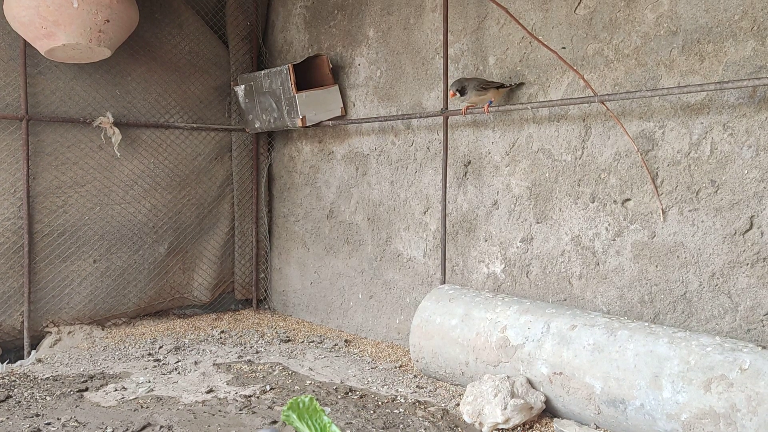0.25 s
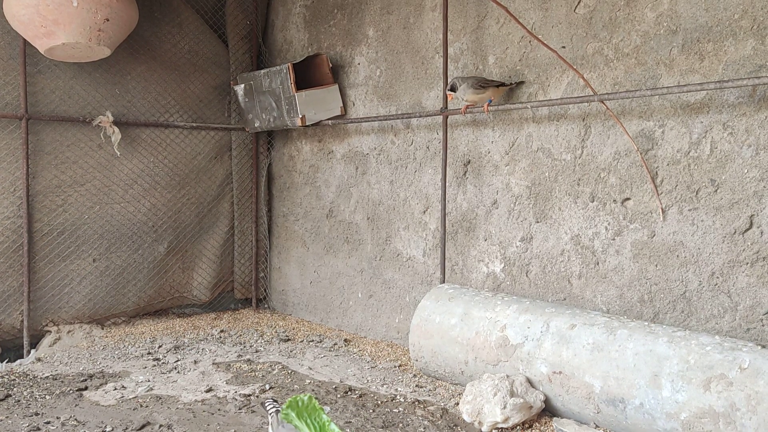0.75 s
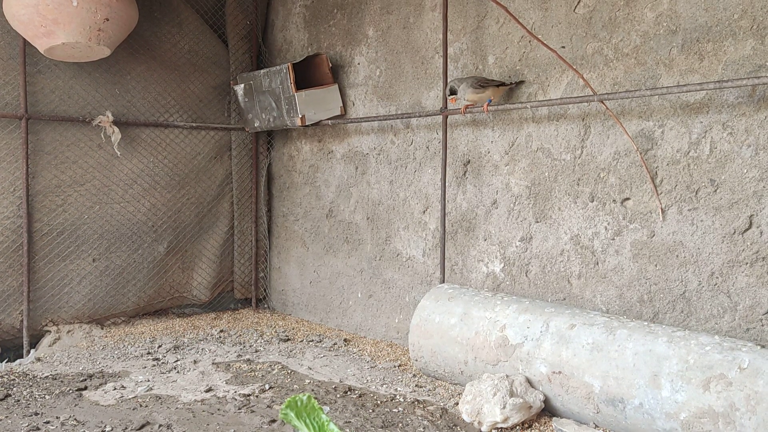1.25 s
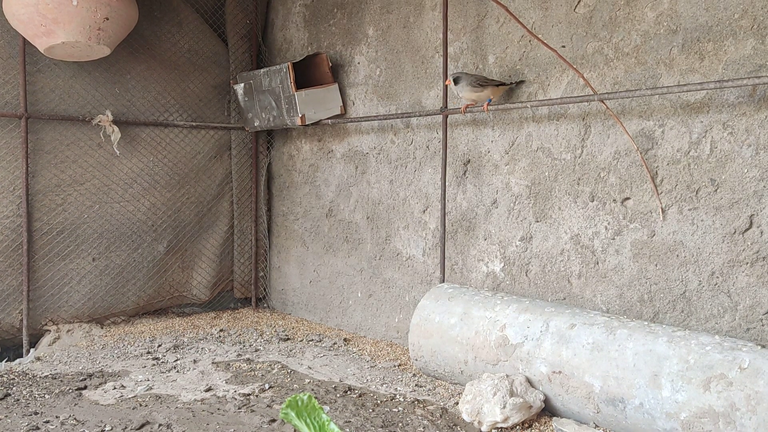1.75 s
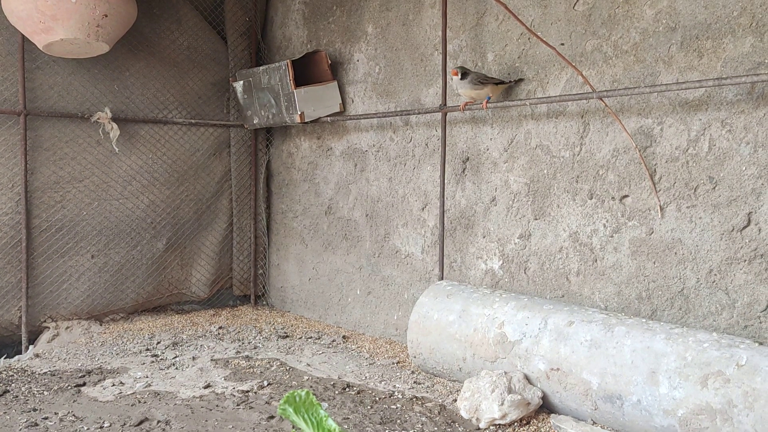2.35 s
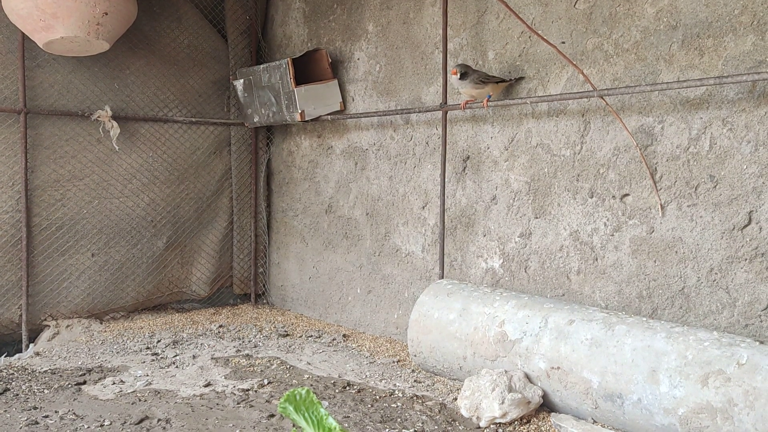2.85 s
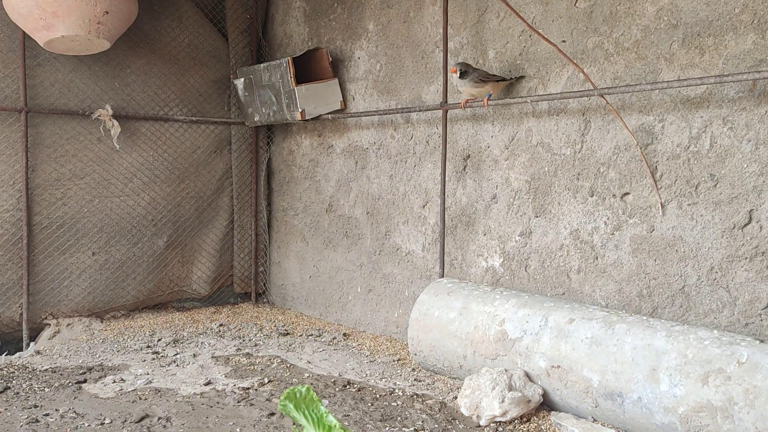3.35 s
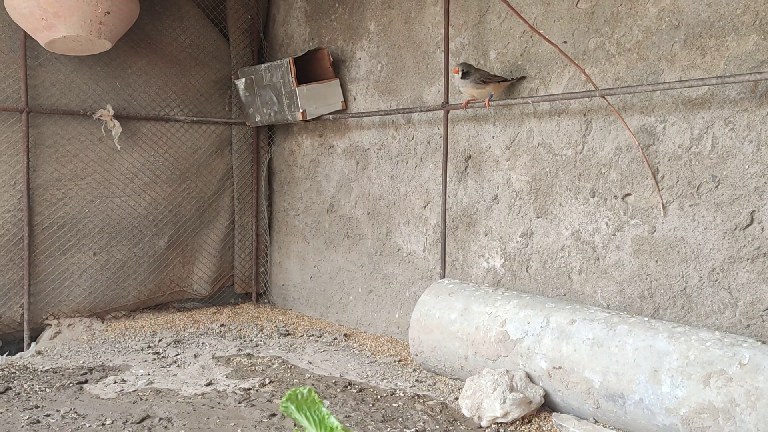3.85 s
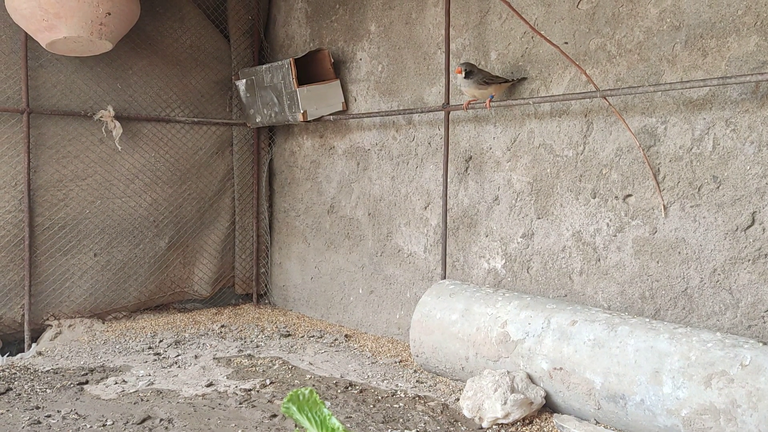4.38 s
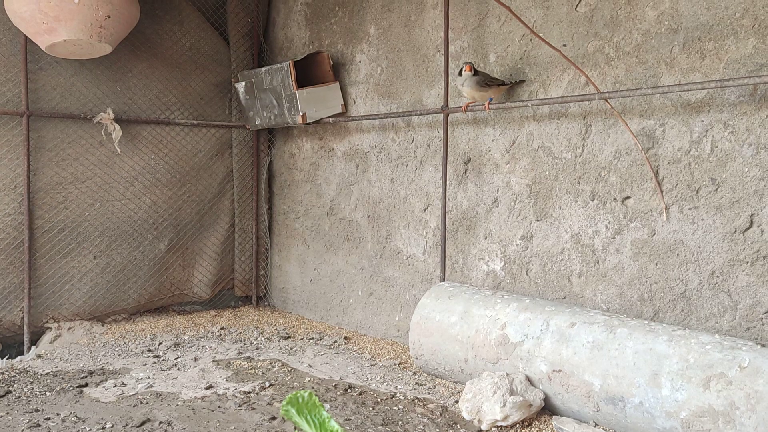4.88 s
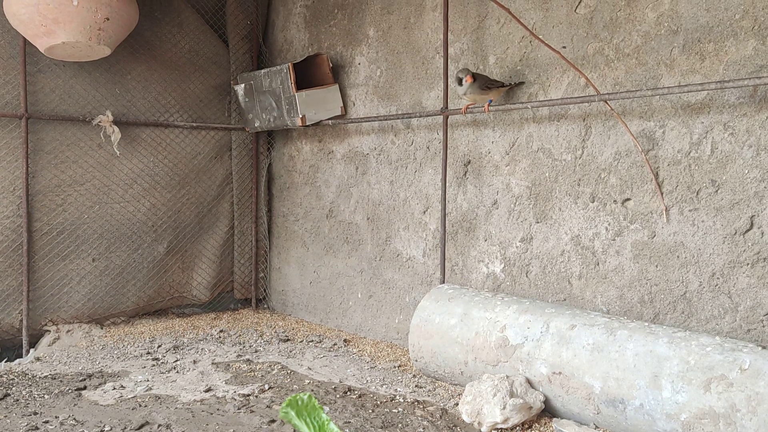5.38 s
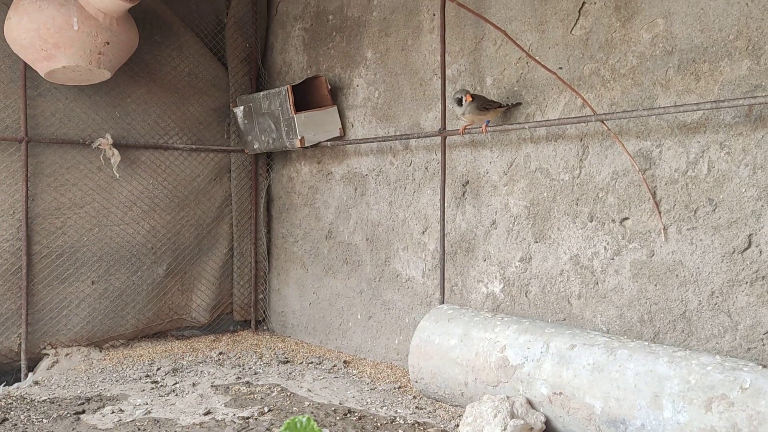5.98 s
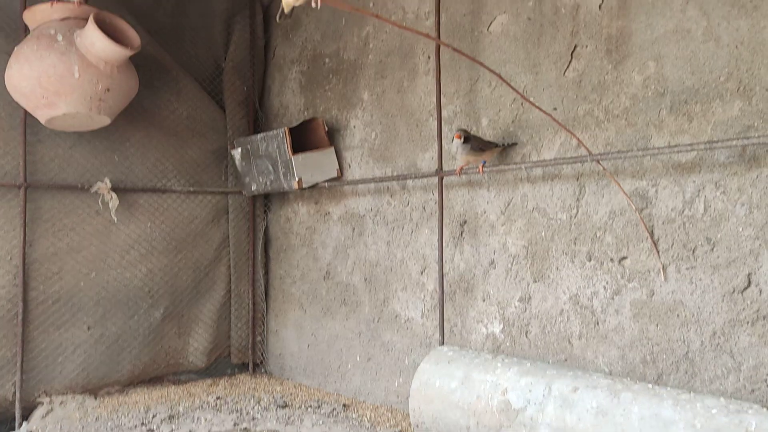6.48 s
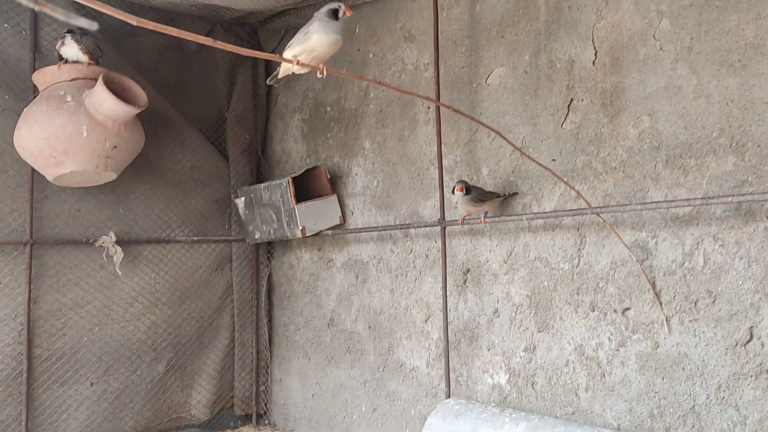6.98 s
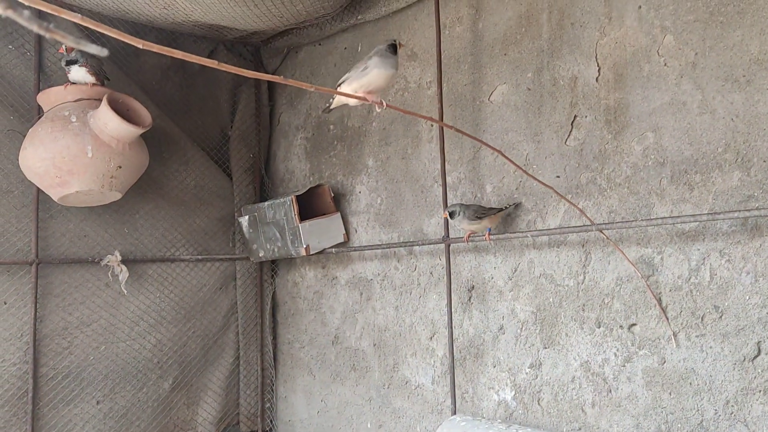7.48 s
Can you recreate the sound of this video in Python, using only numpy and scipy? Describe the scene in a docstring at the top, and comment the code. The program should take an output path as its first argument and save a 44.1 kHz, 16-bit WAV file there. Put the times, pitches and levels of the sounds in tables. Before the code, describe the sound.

From the start until about 3.6 seconds, a nearby finch repeats a quick, buzzy song of short raspy notes, about five rounds with brief gaps. Around 3.8 seconds the flock takes over with two quick double calls, then held nasal notes and hoarse falling chirps until about 5.4. A sharp, louder call, a rising whistle breaking into a rasp, comes at 5.2 and again at 6.7, with softer notes between. A wavering call follows at 7.3, then one small chirp. Seed husks tick crisply, most clearly between 4.6 and 4.9, and more lightly afterwards. A few faint wing puffs and soft knocks occur, and a farther bird calls dully now and then from 2 seconds on. Throughout, a distant engine gives a low, throbbing rumble under a soft hiss of air. The aviary sounds small, with short reflections from close walls.

```python
"""A small concrete aviary: a male finch repeats his buzzy song, then the flock trades nasal calls.
Each voice is a source and a filter: membranes of the syrinx snap once a cycle, and windpipe and beak
shape the harmonics. Seed husks tick, wings puff, and the close walls reflect calls and ticks at once.
A slow engine far off drives the low resonances of the building under a soft hiss of air."""
import sys
import numpy as np
from scipy import signal
from scipy.fft import rfft, irfft
from scipy.io import wavfile
from scipy.ndimage import uniform_filter1d

SR = 44100
rng = np.random.default_rng(int(sys.argv[2]) if len(sys.argv) > 2 else 0)


def store_wav(level_fs):
    """Save 16-bit WAV to argv[1]."""
    pcm = np.round(np.clip(np.atleast_2d(level_fs), -1, 1) * 32767)
    wavfile.write(sys.argv[1], SR, pcm.T.astype(np.int16))


N = 340893

# response of windpipe and beak in the nearby flock: frequency_hz, gain_db
FLOCK_TRACT = [(400, -34), (1000, -16), (1900, -8.5), (2600, 0.5), (4500, -1), (5600, -6), (7000, -14.5),
               (10300, -18), (11500, -31), (14000, -32)]
# notes of the flock's calls: start_s, length_s, start_hz, end_hz, level_db, roughness, slope_db_per_octave
LOUD_CALL = [(0, .025, 2950, 3200, -33, 0.4, -16), (.019, .023, 3050, 5110, -26.5, .4, -23),
             (.034, .018, 5200, 4750, -16, .35, -21), (.045, .09, 1039, 530.6, -26.5, 0.502, 2)]  # a whistle climbs and breaks into a falling rasp
DOUBLE_CALL = [(0, .052, 959, 639.8, -32, 0.32, .7), (.045, 0.06, 640, 560.3, -34, 0.2, -0.8)]  # a quick drop, then a held note
ARCHED_CALL = [(0, 0.0483, 761, 667, -30.5, .65, 0.88), (.042, 0.032, 700, 740, -30, .2, 0),
               (.068, .033, 738, 690, -30, .2, 0), (.097, .036, 700, 539, -32, .4, -1.1)]  # the pitch dips, rises and falls


def undb(db):
    """Decibels to amplitude ratio."""
    return 10 ** (np.asarray(db) / 20)


def at_level(x, db):
    """Scale to an rms level."""
    return x * undb(db) / np.sqrt(np.mean(x ** 2) + 1e-18)


def colour(x, points, slope_db=0.):
    """Spectral shaping by (frequency_hz, gain_db) points plus a slope in dB per octave."""
    octaves = np.log2(np.arange(x.shape[-1] // 2 + 1) * SR / x.shape[-1] + 1)
    hz, db = np.transpose(points)
    gain = undb(np.interp(octaves, np.log2(hz), db) + slope_db * octaves)
    return irfft(rfft(x) * gain, x.shape[-1])


def resonate(x, hz, width_hz):
    """A damped second-order resonator."""
    return signal.lfilter(*signal.iirpeak(hz, hz / width_hz, SR), x)


def wander(rate_hz, n=N):
    """Random modulation: smoothed steps with a spread near 1."""
    hold = max(int(SR / rate_hz), 1)
    steps = np.repeat(rng.standard_normal(n // hold + 1), hold)
    return 1.324 * uniform_filter1d(uniform_filter1d(steps, hold), hold)[:n]


def add(track, start_s, x):
    """Superpose x on the track from start_s."""
    i = int(start_s * SR)
    x = x[..., max(-i, 0):max(N - i, 0)]
    track[..., max(i, 0):max(i, 0) + x.shape[-1]] += x


def syrinx(length_s, hz0, hz1, level_db, roughness, slope_db, tract):
    """Source and filter: snapping membranes make harmonics, blurred by jitter and leaking air."""
    attack_s, release_s, fade_db = .0096, .011, -2
    n = int(length_s * SR)
    progress = np.linspace(0, 1, n)
    hz = hz0 * (hz1 / hz0) ** progress
    jitter = 1 + .003 * wander(60, n) + .06 * roughness * wander(700, n)
    phase = 2 * np.pi * np.cumsum(hz * jitter) / SR
    harmonics = np.arange(1, 14500 / hz.min() + 1)[:, None]
    tract_hz, tract_db = np.transpose(tract)
    formant_db = np.interp(np.log(harmonics * hz), np.log(tract_hz), tract_db, right=-99)
    gain = undb(formant_db + slope_db * np.log2(harmonics))
    # the two halves of the syrinx and the moving beak favour some harmonics and drop others
    gain *= undb([3 * wander(40, n) for _ in harmonics])
    tone = np.sum(gain * np.cos(harmonics * phase), axis=0)
    tone /= np.sqrt(np.sum(gain ** 2, axis=0) / 2)
    # air leaks in a puff each cycle and is weak below the fundamental
    air = rng.standard_normal(n) * (1 + .63 * np.cos(phase))
    air = colour(colour(air, tract, slope_db), [(.49 * hz.mean(), -40), (hz.mean(), 0)])
    voice = np.sqrt(1 - roughness ** 2) * tone + roughness * at_level(air, 0)
    edges = np.clip(np.minimum(progress / attack_s, (1 - progress) / release_s) * length_s, 0, 1)
    shimmer_db = 4 * roughness * wander(140.5, n)
    return voice * undb(level_db + fade_db * (progress - .5) + shimmer_db) * edges


def aviary(x, pan_db, lag_ms):
    """Reverberation, then interaural differences: pan_db favours the left ear, lag_ms delays it."""
    wall_t60_s, wall_db, yard_t60_s, yard_db = .04, -5, .3, -19
    t = np.arange(int(.25 * SR)) / SR
    response = 1. * (t == 0)  # direct sound
    for t60_s, db in ((wall_t60_s, wall_db), (yard_t60_s, yard_db)):
        tail = rng.standard_normal((2, len(t))) * np.exp(-np.log(1000) * t / t60_s) * (t > .0012)
        response = response + tail * undb(db) / np.sqrt(np.sum(tail ** 2, axis=1, keepdims=True))
    ears = signal.fftconvolve(x[None], response, axes=1) / np.sqrt(1 + undb(2 * wall_db))
    ears = np.pad(ears, ((0, 0), (64, 64)))  # room for the lag
    ears[0] = np.roll(ears[0], int(round(lag_ms * SR / 1000)))
    return ears[:, 64:] * undb([[pan_db / 2], [-pan_db / 2]])


def singer():
    """The male repeats his song from one perch; steady formants colour every gliding note."""
    # notes of the song: start_s, length_s, start_hz, end_hz, level_db, roughness, slope_db_per_octave
    motif = [(-.082, 0.048, 660, 449.7, -39.5, 0.54, -4), (.001, .047, 895, 863.7, -25, 0.51, 2),
             (.081, 0.044, 907, 754, -37, 0.33, -4), (.127, 0.028, 830, 780, -41.5, 0.73, -3.5),
             (0.153, .056, 1400, 950, -35.5, 0.73, .5), (0.223, .025, 3790, 3580, -34, 0.24, -18),
             (.248, .034, 867, 725.2, -40, .15, -1.5), (0.297, 0.017, 2417, 2240, -34, 0.26, -3.5),
             (.314, .048, 758, 660.1, -42.5, .69, -4), (0.355, 0.056, 1240, 1000, -31.5, 0.51, 0),
             (.408, 0.046, 795, 719.8, -43, 0.74, -3.5), (0.448, 0.029, 790, 707, -33, 0.45, 0),
             (0.471, .058, 1070, 600.1, -30, 0.41, -1)]
    # repeats of the song: start_s, time_stretch, gain_db
    rounds = [(-.348, 0.97, 1.5), (.354, 0.97, 0), (1.316, 0.98, 0.5), (2.016, 1.005, 0.5),
              (2.846, 1.01, 0)]
    # response of his windpipe, beak and perch: frequency_hz, gain_db
    tract = [(500, -23.5), (800, -11.5), (1200, -12), (1650, -17.5), (2350, -2.5), (2700, -11),
             (3050, -0.5), (3350, -7), (3700, -6), (4000, -2), (4400, 2), (4800, -5), (5250, 0.5),
             (5800, -7.5), (6200, 1.5), (8200, -8), (9500, -21), (11000, -31.5), (14000, -28)]
    song = np.zeros(N)
    for round_s, stretch, db in rounds:
        for start_s, length_s, *voice in motif:
            add(song, round_s + stretch * start_s, undb(db) * syrinx(stretch * length_s, *voice, tract))
    return aviary(song, pan_db=2.3, lag_ms=-.36)[:, :N]


def flock_calls():
    """Frequency modulation: overlapping glides join into calls, each from its own perch."""
    # calls in turn: notes, start_s, pitch_ratio, gain_db, pan_db, lag_ms
    calls = [(DOUBLE_CALL, 3.803, 0.98, -1.6, 1.5, -.13), (DOUBLE_CALL, 3.96, 0.99, 1.2, 1.5, -.12),
             (LOUD_CALL, 5.19, 1.02, 0.39, .5, .29), (LOUD_CALL, 6.711, .98, -0.41, 1.6, -.28),
             (ARCHED_CALL, 7.318, 1.001, 0.44, 3.3, .01)]
    out = np.zeros((2, N))
    for notes, call_s, ratio, db, pan_db, lag_ms in calls:
        call = np.zeros(SR // 5)
        for start_s, length_s, hz0, hz1, *voice in notes:
            add(call, start_s, syrinx(length_s, ratio * hz0, ratio * hz1, *voice, FLOCK_TRACT))
        add(out, call_s, aviary(undb(db) * call, pan_db, lag_ms))
    return out


def contact_chirps():
    """Short falling chirps, made hoarse by aperiodic vibration."""
    # chirps: start_s, pitch_hz, level_db, slope_db_per_octave, pan_db, lag_ms
    chirps = [(4.78, 631.6, -39, 0, 3.5, 0.39), (4.959, 579, -45, 0, 2, 0.48),
              (5.093, 590, -36.5, 2.5, 2, .43), (6.263, 619, -54, 0, 8.5, 0.19),
              (6.548, 616, -46.5, -7.5, 4, -.77), (7.618, 622, -47.5, 5, 5, 0.35)]
    length_s, end_ratio, roughness = .047, .81, .51
    out = np.zeros((2, N))
    for start_s, hz, db, slope_db, pan_db, lag_ms in chirps:
        chirp = syrinx(length_s, hz, end_ratio * hz, db, roughness, slope_db, FLOCK_TRACT)
        add(out, start_s, aviary(chirp, pan_db, lag_ms))
    return out


def nasal_notes():
    """Held notes sound nasal because the tract favours upper harmonics."""
    # notes: start_s, length_s, pitch_hz, level_db, roughness, slope_db_per_octave, pan_db, lag_ms
    notes = [(4.067, .12, 447.4, -42.5, 0.12, -.6, 3.5, .48), (4.245, .058, 461.5, -37, 0.45, 0, 2, .48),
             (5.3, .091, 509.6, -35.5, 0.17, -4, 2, .91), (6.572, 0.12, 500, -44.5, 0.1, -8, 5.5, -.66)]
    sag_hz_per_s = 230
    out = np.zeros((2, N))
    for start_s, length_s, hz, *voice, pan_db, lag_ms in notes:
        note = syrinx(length_s, hz, hz - sag_hz_per_s * length_s, *voice, FLOCK_TRACT)
        add(out, start_s, aviary(note, pan_db, lag_ms))
    return out


def far_bird():
    """Attenuation with distance leaves one bird's calls faint and dull."""
    # slightly falling calls: start_s, length_s, pitch_hz, level_db, roughness
    calls = [(2.06, 0.082, 806, -47, 0.19), (2.53, .07, 491.5, -46.5, 0.1), (2.654, .075, 798, -45, 0.42),
             (6.39, 0.08, 789, -49.5, 0.4), (3.431, .16, 1034, -56, 0.57), (4.801, .27, 746, -51.5, .3),
             (5.136, 0.077, 748, -54, 0.2)]
    # vocal response dulled by distance: frequency_hz, gain_db
    tract = [(700, -17), (1450, 0), (2200, 3.5), (2900, -9.5), (4500, -12), (6500, -24)]
    out = np.zeros((2, N))
    for start_s, length_s, hz, db, roughness in calls:
        call = syrinx(length_s, hz, .94 * hz, db, roughness, slope_db=0, tract=tract)
        add(out, start_s, aviary(call, pan_db=1, lag_ms=.32))
    return out


def husk_ticks():
    """Impulsive excitation: a cracking husk gives a bright burst that decays exponentially."""
    # seed husks and claws: start_s, level_db, centre_hz, pan_db
    ticks = [(1.139, -36.5, 6120, -1.5), (4.6367, -25.5, 6800, -8), (4.6654, -30.5, 8850, -1.5),
             (4.8745, -27.5, 7900, -1), (5.776, -40.5, 6180, -2.0), (5.854, -36.5, 7100, 0),
             (6.0896, -46.5, 7900, -0.5), (6.137, -44, 8160, -1.0), (6.462, -39.5, 6640, -1.0),
             (6.5081, -45, 6500, -1.0), (7.1545, -38, 6500, 8)]
    t60_s = .025
    t = np.arange(int(.05 * SR)) / SR
    out = np.zeros((2, N))
    for start_s, db, hz, pan_db in ticks:
        crack = resonate(rng.standard_normal(len(t)), hz, .43 * hz) * np.exp(-np.log(1000) * t / t60_s)
        crack = colour(crack, [(2500, -18), (4500, -9)])
        crack *= undb(db + 4.5) / np.abs(crack).max()
        add(out, start_s, aviary(crack, pan_db, lag_ms=.2))
    return out


def wing_puffs():
    """Air pushed by a wing makes a short swell of band-limited noise."""
    # wing puffs and soft knocks: start_s, length_s, centre_hz, width_hz, level_db
    puffs = [(0.451, 0.079, 1010, 1400, -51), (2.15, 0.065, 127.3, 79.7, -41),
             (2.249, 0.048, 164.3, 114, -38.5), (2.949, 0.16, 201, 196.7, -51), (4.208, .12, 487, 685, -50),
             (5.73, 0.015, 880, 600, -53), (7, .15, 350, 400, -57.5)]
    out = np.zeros((2, N))
    for start_s, length_s, hz, width_hz, db in puffs:
        n = int(length_s * SR)
        air = resonate(resonate(rng.standard_normal(n), hz, width_hz), hz, width_hz)
        air *= undb(4.2 * wander(69, n)) * np.hanning(n) ** .5
        add(out, start_s, at_level(air, db) * undb([[1.5], [-1.5]]))  # a little to the left
    return out


def engine():
    """Forced vibration: each slow stroke, then two weaker ones, excites the building's low modes."""
    # modes of the building: frequency_hz, width_hz, gain_db
    modes = [(62, 19.9, 1), (44.3, 17, -8), (84.4, 25, -8.5), (161.2, 27, -18.5)]
    first_s, period_s, level_db = .115, .2745, -38
    strokes, throb = np.zeros((2, N))
    for start_s in np.arange(first_s, N / SR, period_s):
        for cycle_share, db in ((0, 0), (.4, -7), (.7, -9.5)):
            add(strokes, start_s + cycle_share * period_s, undb([db + 2 * rng.standard_normal()]))
    for hz, width_hz, db in modes:
        ringing = resonate(resonate(strokes, hz, width_hz), hz, width_hz)
        throb += undb(db) * resonate(ringing, hz, 2 * width_hz) / width_hz
    return at_level(throb, level_db)


def hiss():
    """Steady air noise whose interaural coherence falls with frequency; the treble flickers a little."""
    # spectrum of air and far machinery: frequency_hz, relative_density_db
    spectrum = [(12, -44), (20, -3), (48, -1), (77, -1), (201, -21), (280, -23), (369, -33), (1720, -41.5),
                (1970, -38.5), (3420, -48), (7810, -45), (14300, -58)]
    mid, side = rng.standard_normal((2, N))
    side = colour(side, [(60, -9), (130, -4), (290, -6), (640, -3), (1400, 0)])
    air = at_level(colour(np.array([mid + side, mid - side]), spectrum), db=-37.5)
    treble = colour(air, [(1200, -41), (2500, 0)])
    flicker = undb(1.8 * wander(12) + 1.5 * wander(1.5))
    return air + (flicker - 1) * treble


def scene():
    """Superposition of the birds, their small noises, the far engine and the air."""
    birds = singer() + flock_calls() + contact_chirps() + nasal_notes() + far_bird()
    return birds + husk_ticks() + wing_puffs() + engine() + hiss()


def record(dry):
    """Band limiting: an elliptic low-pass filter cuts the top steeply."""
    cutoff_hz = 14350
    return signal.sosfilt(signal.ellip(10, .2, 70, cutoff_hz, fs=SR, output="sos"), dry)


dry = scene()
out = record(dry)
store_wav(out)
```